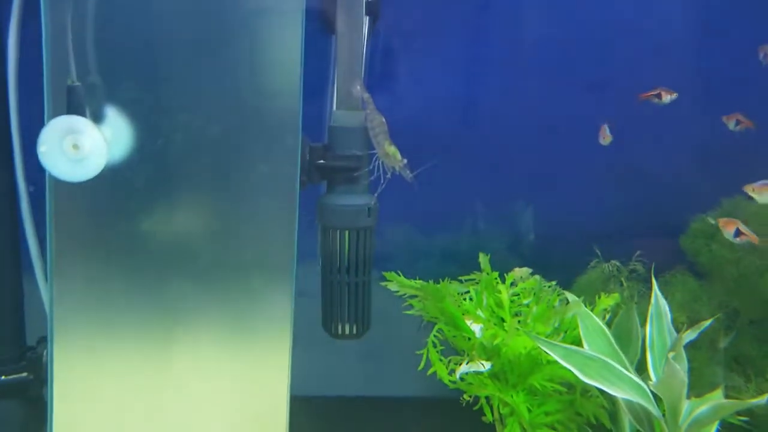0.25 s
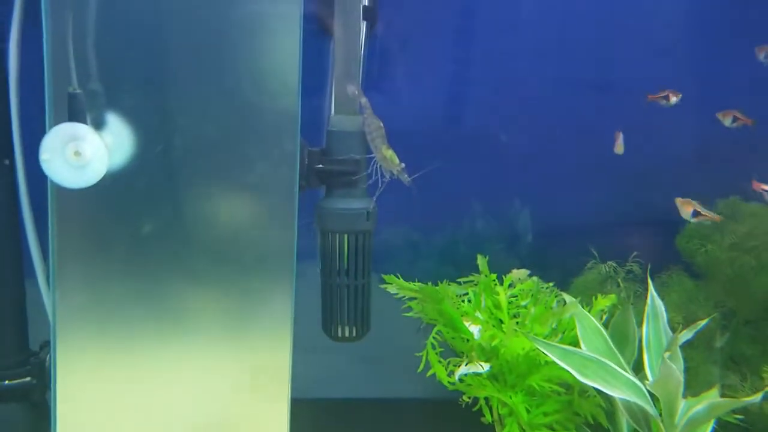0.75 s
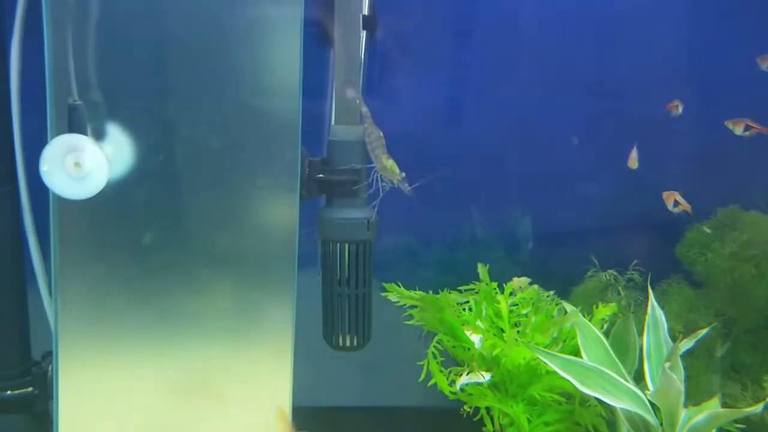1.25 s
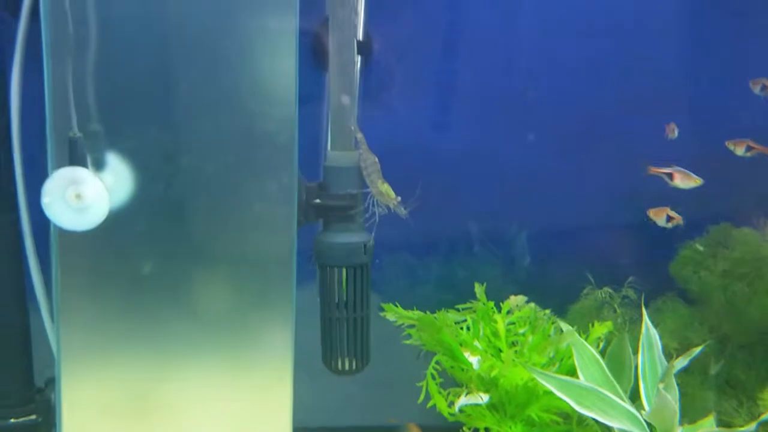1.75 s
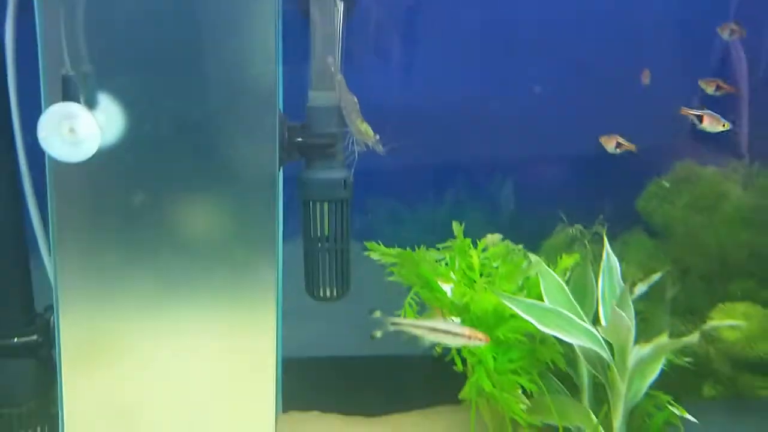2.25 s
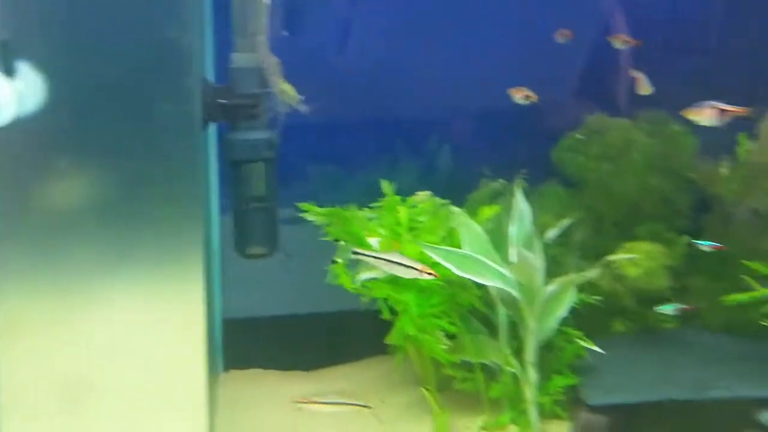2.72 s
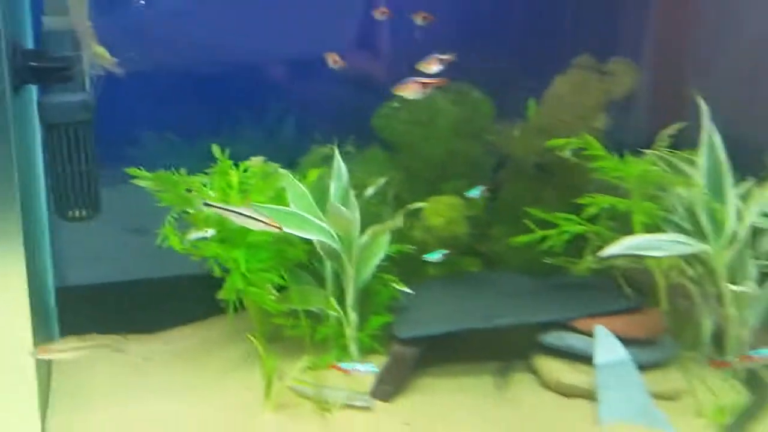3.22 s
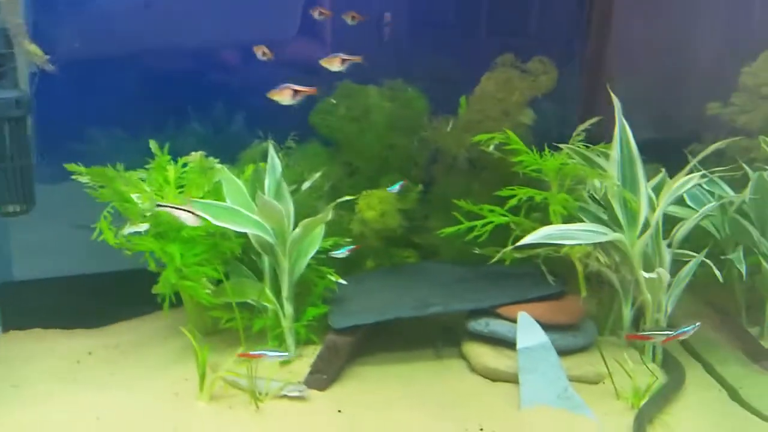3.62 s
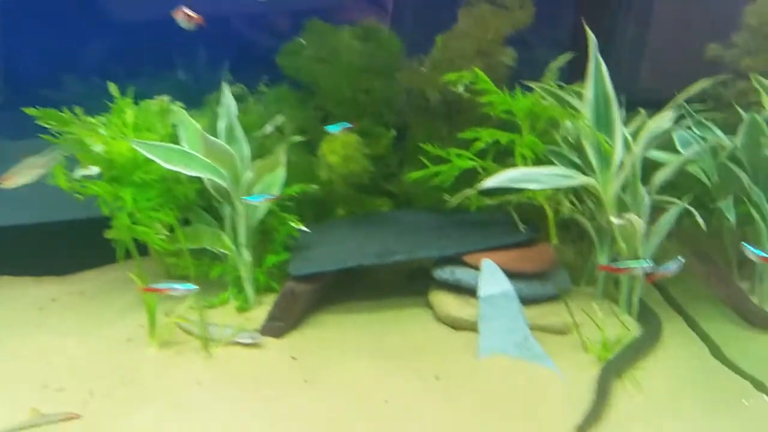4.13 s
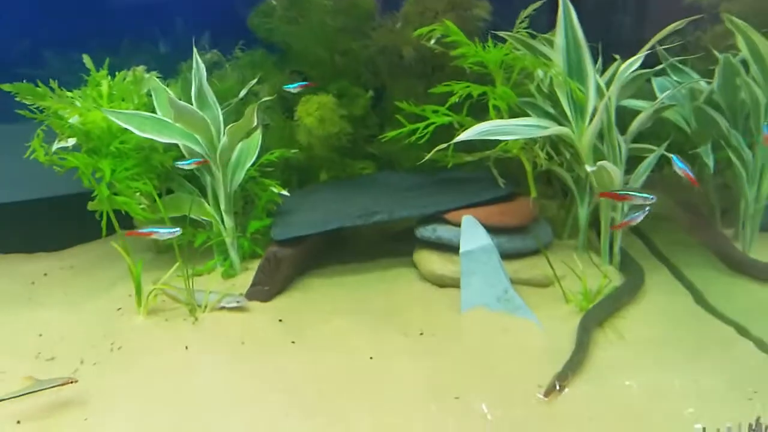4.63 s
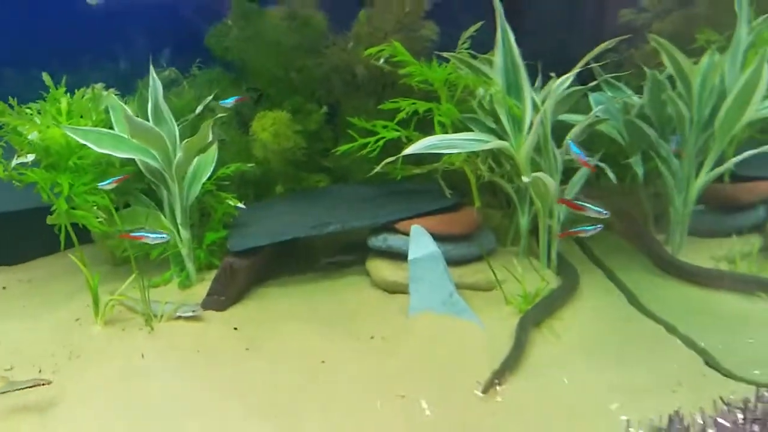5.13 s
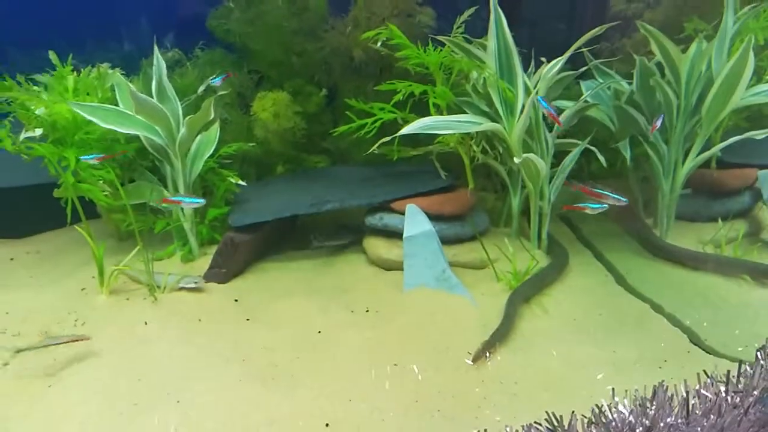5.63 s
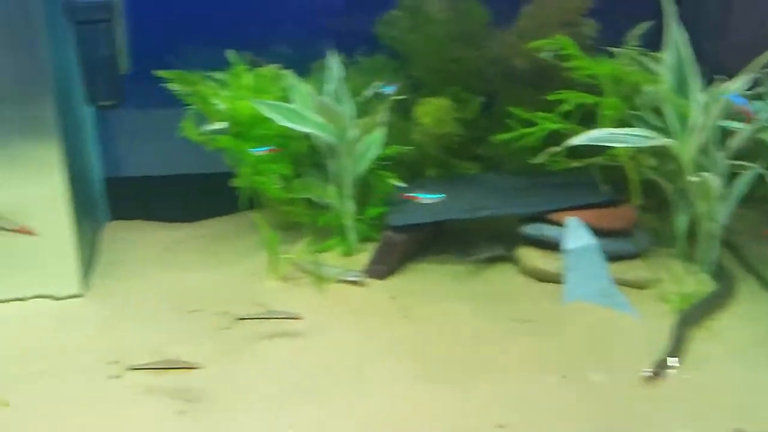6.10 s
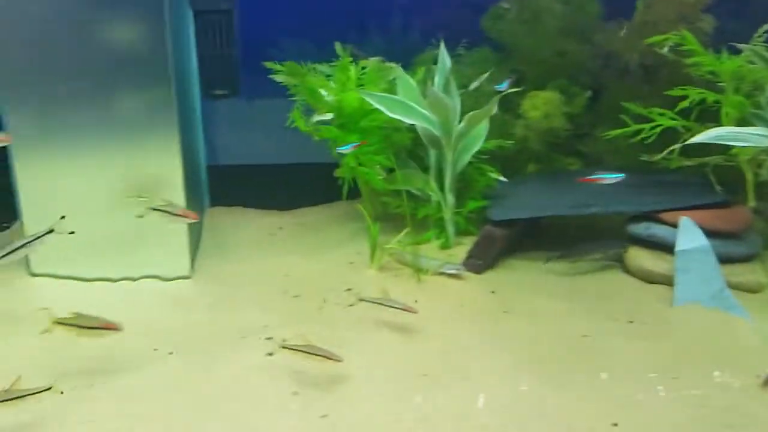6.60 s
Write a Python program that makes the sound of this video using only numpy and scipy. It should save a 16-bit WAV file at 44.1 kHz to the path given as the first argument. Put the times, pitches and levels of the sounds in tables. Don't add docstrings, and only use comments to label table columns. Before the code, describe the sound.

Indoors beside an aquarium, a pump motor gives a constant low electrical hum, deep with a slightly buzzy edge, from beginning to end. Soft room rumble sits around it, with very faint, fine water trickling and thin microphone hiss far below. Two tiny finger bumps on the handheld device come almost at once, another at about 1.2 seconds and a pair near 1.7. A denser flurry of dull knocks runs from 2.1 to 2.45, with a small one near 2.75. The hiss lifts briefly around 2.5 and 3.1 as the hand swings. From 3 seconds the microphone moves away and the hum's upper buzz thins while its low base stays nearly steady. The strongest bumps, a short uneven stereo cluster with a slight rub, come at 4.2 to 4.3. Then only quieter hum, rumble and faint trickle remain, the trickle changing colour very slightly near 5.8, until about 6.9 seconds.

```python
import sys
import numpy as np
from scipy import signal
from scipy.fft import rfft, irfft, next_fast_len
from scipy.io import wavfile
from scipy.ndimage import uniform_filter1d

SR = 44100
rng = np.random.default_rng(int(sys.argv[2]) if len(sys.argv) > 2 else 0)


def gain_from_db(level_db):
    decades = np.asarray(level_db, float) / 20
    return 10 ** decades


def transcribe(signal):
    frames = np.atleast_2d(signal).T
    limited = np.clip(frames, -1, 1)
    pcm = np.round(limited * 32767).astype(np.int16)
    wavfile.write(sys.argv[1], SR, pcm)


N = 302526


def walk(rate_hz):
    hold = int(SR / rate_hz)
    steps = np.repeat(rng.standard_normal(N // hold + 1), hold)
    slewed = uniform_filter1d(uniform_filter1d(steps, hold), hold)
    return 1.3 * slewed[:N]


def ring(x, hz, width_hz):
    b, a = signal.iirpeak(hz, hz / width_hz, fs=SR)
    return signal.lfilter(b, a, x)


def bandpass(low_hz, high_hz):
    return signal.butter(2, [low_hz, high_hz], "band", fs=SR, output="sos")


def colour(white, table, flicker_db, rate_hz):
    hz, *side_db = np.transpose(table)
    size = next_fast_len(N)
    octave = np.log2(np.fft.rfftfreq(size, 1 / SR) + 1)
    gain = [gain_from_db(np.interp(octave, np.log2(hz), db, left=-200, right=-200)) for db in side_db]
    spectrum = rfft(white, size) * gain * np.sqrt(SR / 2)
    out = 0
    for centre in np.arange(np.log2(hz[0]), np.log2(hz[-1]) + 0.5, 0.5):
        share = np.clip(1 - 2 * abs(octave - centre), 0, 1)
        band = irfft(spectrum * share, size)[:, :N]
        out = out + gain_from_db(flicker_db * walk(rate_hz)) * band
    return out


def pair(alike_hz, lag_s):
    common, left, right = rng.standard_normal((3, N))
    low = signal.butter(1, alike_hz, "low", fs=SR, output="sos")
    high = signal.butter(1, alike_hz, "high", fs=SR, output="sos")
    field = [common, np.roll(common, int(lag_s * SR))]
    return signal.sosfilt(low, field) + signal.sosfilt(high, [left, right])


# multiple of mains, near left level in dB, near right level in dB,
# far left level in dB, far right level in dB.
HUM = [(1.0, -51.0, -50.5, -52.0, -52.0), (2.0, -61, -60.5, -63, -61), (3.0, -63, -59.5, -64.5, -59),
       (4.0, -60.5, -62, -65, -67.5), (5.0, -59.5, -63.5, -62.5, -64.5), (6.0, -62, -63, -71.5, -67.5),
       (7.0, -58.5, -58, -60, -61), (8.0, -62, -62, -64, -68.5), (9.0, -86.5, -82, -90.5, -93.5),
       (11.0, -73.5, -79.5, -88, -86), (12.0, -85, -80, -90, -85), (14.0, -82.5, -86, -94, -92),
       (15.0, -89, -79, -93, -85), (17.0, -74.5, -88.5, -101, -100), (18.0, -77.5, -77.5, -85.5, -86),
       (19.0, -87, -97, -87, -89)]


def hum(far):
    mains_hz, pull_lag_s, port_lag_s = 49.977, 0.0021, 0.0001
    stand_mode_line, case_mode_hz = 3, 375
    lag_s = pull_lag_s + np.array([[0], [port_lag_s]])
    cycle = 2 * np.pi * mains_hz * (np.arange(N) / SR - lag_s)
    out = 0
    for k, near_l, near_r, far_l, far_r in HUM:
        k = round(k)
        flipped = k == stand_mode_line or k * mains_hz > case_mode_hz
        sign = -1 if flipped else 1
        left_db = near_l + far * (far_l - near_l)
        right_db = near_r + far * (far_r - near_r)
        db = np.array([left_db, right_db]) + 0.37 * walk(1.1)
        port_wobble = np.array([walk(1.2), walk(3.6)])
        wobble = k * (0.033 * walk(0.8) + 0.01 * port_wobble)
        out = out + sign * np.sqrt(2) * gain_from_db(db) * np.cos(k * cycle + wobble)
    return out


# frequency in Hz, left level in dB per Hz, right level in dB per Hz.
RUMBLE = [(21.4, -87, -88.5), (34.7, -84.5, -86.5), (44.8, -82, -84.5), (65.5, -77, -73.5),
          (76.8, -74.5, -66.5), (91.5, -80, -82), (115, -79.5, -86.5), (172, -81, -82), (216, -87, -80),
          (360, -82.5, -90), (469, -87, -88.5), (532, -95, -97.5), (867, -100, -99), (1321, -106, -106)]


def rumble(far):
    far_change_db = -4
    return colour(pair(380, 0.00026), RUMBLE, 0.25, 6) * gain_from_db(far_change_db * (far - 0.5))


# frequency in Hz, left level in dB per Hz,
# right level in dB per Hz.
HISS = [(1500, -120, -120), (2900, -115, -115), (3600, -121, -119), (4900, -124, -120.5),
        (5500, -127.5, -123), (6100, -130, -125.5), (7000, -123.5, -122), (7380, -127.5, -127.5),
        (7850, -119.5, -120.5), (8450, -126, -128), (9150, -122.5, -126.5), (10500, -126.5, -127.5),
        (12100, -117.5, -119.5), (14600, -118.5, -119.5)]
# time in seconds, lift in dB, length in seconds.
SWINGS = [
    (2.45, 3, 0.28),
    (3.09, 4, 0.16),
]


def hiss(far):
    t, far_change_db = np.arange(N) / SR, -2
    lift_db = sum(db * np.exp(-((t - at_s) / length_s) ** 2) for at_s, db, length_s in SWINGS)
    breath_db = 0.45 * walk(40)
    level_db = -0.1 + far_change_db * (far - 0.5) + lift_db + breath_db
    return colour(rng.standard_normal((2, N)), HISS, 0.4, 27) * gain_from_db(level_db)


# frequency in Hz, left level in dB, right level in dB.
TRICKLE = [(1063, -24, -28), (1372, -13, -6), (1605, 0.5, -7.5), (2230, 0, -6), (2610, -5.5, -14.5),
           (2970, -29, -23.5), (4020, -49, -73)]


def trickle(flow_db):
    splashes_per_s = 8000
    turn_s, turn_length_s = 5.82, 0.15
    gap_hz, gap_width_hz, gap_db = 1725, 290, -1
    falls = rng.random((2, N)) < splashes_per_s / SR
    size_db = 2.6 * np.minimum(rng.exponential(size=(2, N)), 5.5)
    splashes = falls * rng.standard_normal((2, N)) * gain_from_db(size_db)
    water = colour(splashes, TRICKLE, 1.2, 25) * gain_from_db(0.4 * walk(20))
    turned = 0.5 + 0.5 * np.tanh((np.arange(N) / SR - turn_s) / turn_length_s)
    water = water + gain_from_db(gap_db) * turned * ring(water, gap_hz, gap_width_hz)
    return water / water.mean(axis=0).std() * gain_from_db(flow_db)


# time in seconds, peak in dB, length in ms, left over right in dB.
BUMPS = [(0.0295, -31, 1.42, 8), (0.047, -41, 1.6, 12), (1.16, -38, 2.3, -7), (1.6867, -41.5, 1.27, 14),
         (1.715, -40, 2.1, 13), (2.148, -36.5, 1.13, -15), (2.1736, -33.5, 1.7, -5),
         (2.1832, -31.5, 2.46, -3), (2.1865, -32.5, 2.4, 15), (2.2023, -30.5, 1.26, 15),
         (2.207, -35, 2.8, 5), (2.3992, -35, 2.7, 9), (2.4146, -35, 2.6, 5), (2.4375, -37.5, 0.82, 12),
         (2.4442, -32.5, 2.5, 15), (2.7584, -37, 1.4, -10), (2.7626, -40, 1.7, 14), (4.202, -40, 0.56, -6),
         (4.202, -29, 1.44, -13), (4.2061, -25, 1.25, 20), (4.2193, -28.5, 2.1, 7.5), (4.259, -40, 3.9, 2),
         (4.3251, -39, 4, -9)]


def bumps():
    slip_ms, slip_lead_lengths, slip_share = 0.68, 1.39, 0.24
    rebound_lengths, rebound_share, rebound_width = 2.3, 0.5, 1.2
    sway_hz, sway_t60_s, sway_db = 68, 0.22, -37
    shell_hz, shell_width_hz, shell_db = 436, 150, -6.5
    grip_db = 8
    pushes, near = np.zeros((2, N)), np.arange(-1000, 1000)
    for s, db, length_ms, lean_db in BUMPS:
        u = 1000 * near / SR / length_ms
        push = np.exp(-2 * u ** 2)
        rebound = rebound_share * np.exp(-2 * ((u - rebound_lengths) / rebound_width) ** 2)
        slip = slip_share * np.exp(-2 * ((u + slip_lead_lengths) * length_ms / slip_ms) ** 2)
        side_db = db + np.minimum([[lean_db], [-lean_db]], 0)
        pushes[:, int(s * SR) + near] += gain_from_db(side_db) * (push - rebound - slip)
    pole = np.exp((2j * np.pi * sway_hz - np.log(1000) / sway_t60_s) / SR)
    sway = signal.lfilter([1], [1, -pole], np.maximum(pushes, 0)).real * gain_from_db(sway_db) / 10
    shell = gain_from_db(shell_db) * ring(pushes, shell_hz, shell_width_hz)
    knocks = signal.sosfiltfilt(bandpass(40, 950), pushes + sway + shell)
    grip = np.sqrt(abs(signal.lfilter([0.0004], [1, -0.9996], (pushes ** 2).mean(axis=0))))
    rub = signal.sosfilt(bandpass(55, 170), rng.standard_normal((2, N)))
    return knocks + gain_from_db(grip_db) * grip * rub


# time in seconds, remoteness from the pump 0-1, trickle level in dB.
PATH = [
    (0.0, 0.04, -74.5),
    (0.8, 0.18, -73),
    (2.3, 0.14, -71),
    (2.9, 0.04, -71.5),
    (3.3, 0.32, -73),
    (4.0, 0.53, -73.5),
    (4.6, 0.7, -76),
    (5.2, 1, -74.5),
    (6.2, 0.9, -75),
    (6.86, 0.93, -75),
]


def scene():
    at_s, remoteness, trickle_db = np.transpose(PATH)
    t = np.arange(N) / SR
    far = np.interp(t, at_s, remoteness)
    flow_db = np.interp(t, at_s, trickle_db)
    return hum(np.clip(far, -0.3, 1.3)) + rumble(far) + hiss(far) + trickle(flow_db) + bumps()


def squelch(x):
    gate_db = -6.2
    cells = signal.stft(x, nperseg=2048, window="cosine")[2]
    power = uniform_filter1d(abs(cells) ** 2, size=5, axis=1)
    top = uniform_filter1d(power[:, 560:650].mean(axis=(0, 1)), size=5)
    kept = cells * (power > top * gain_from_db(gate_db) ** 2)
    return signal.istft(kept, nperseg=2048, window="cosine")[1][:, :N]


def roll_off(x):
    return signal.sosfilt(signal.butter(12, 14650, fs=SR, output="sos"), x)


def record(dry):
    converter_offset = -0.00046
    return roll_off(squelch(dry) + converter_offset)


dry = scene()
out = record(dry)
transcribe(out)
```